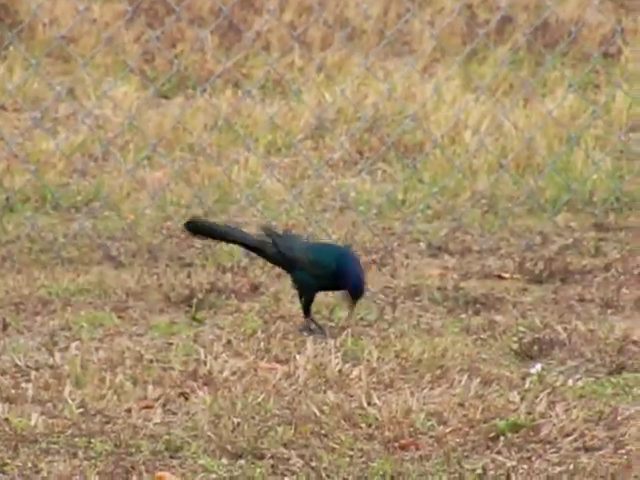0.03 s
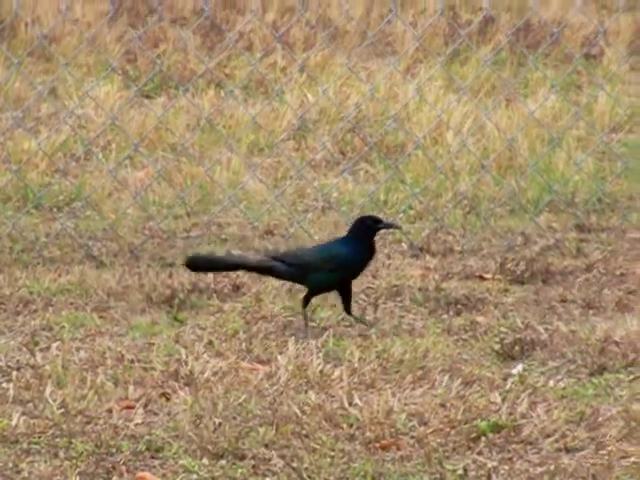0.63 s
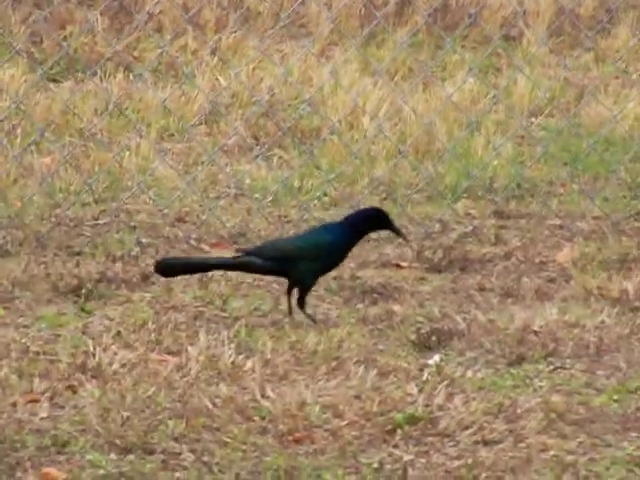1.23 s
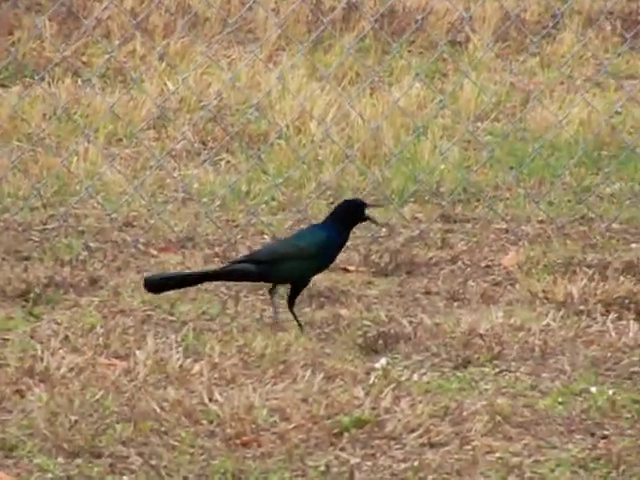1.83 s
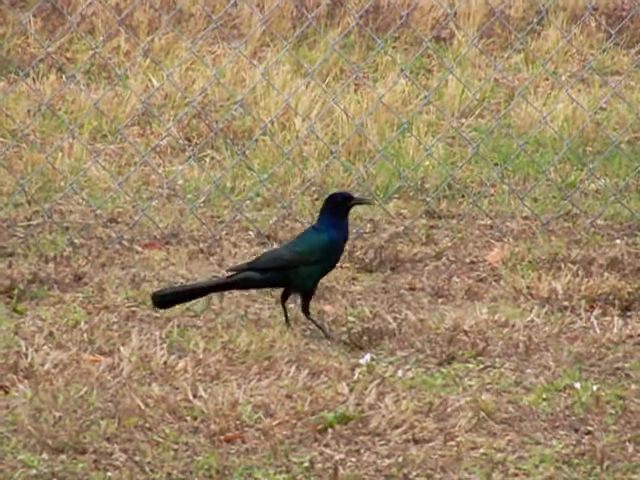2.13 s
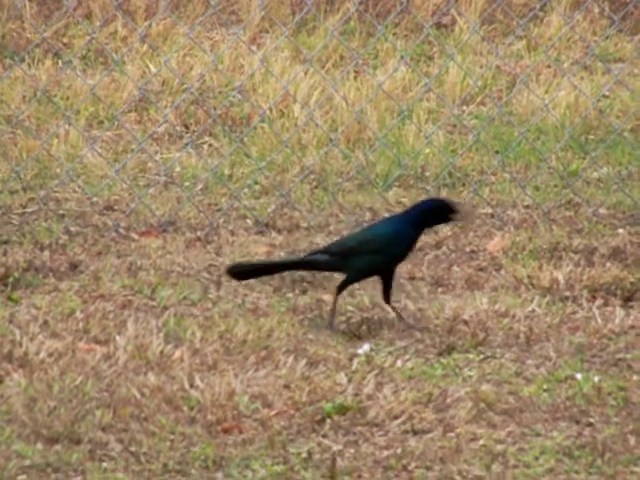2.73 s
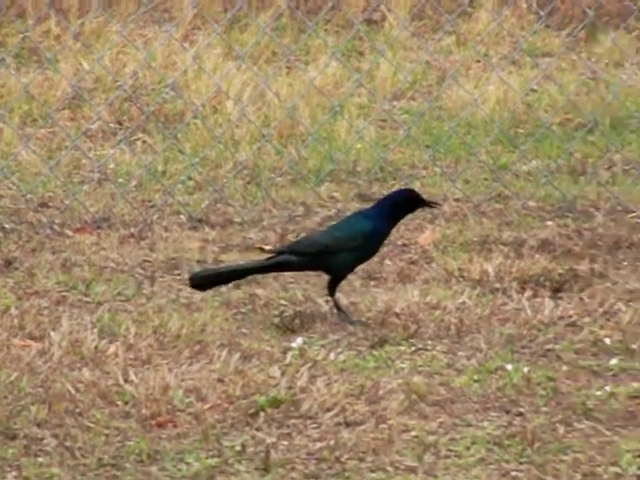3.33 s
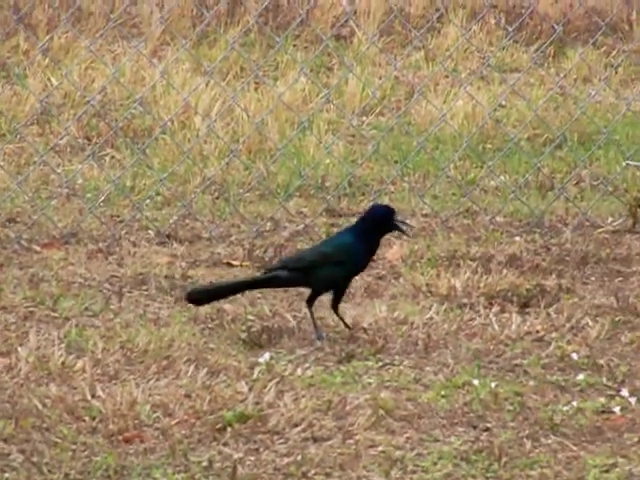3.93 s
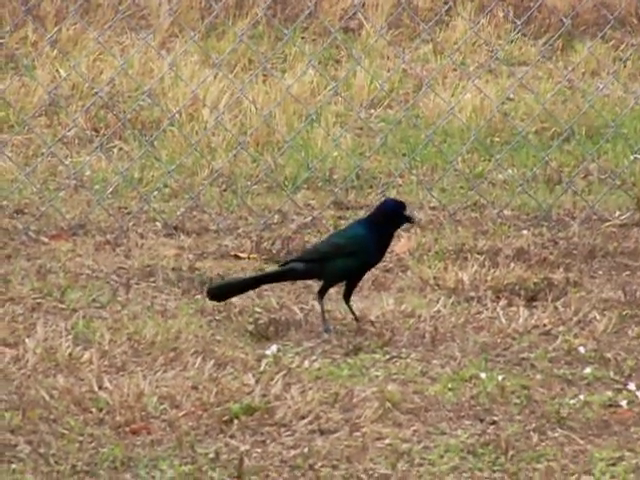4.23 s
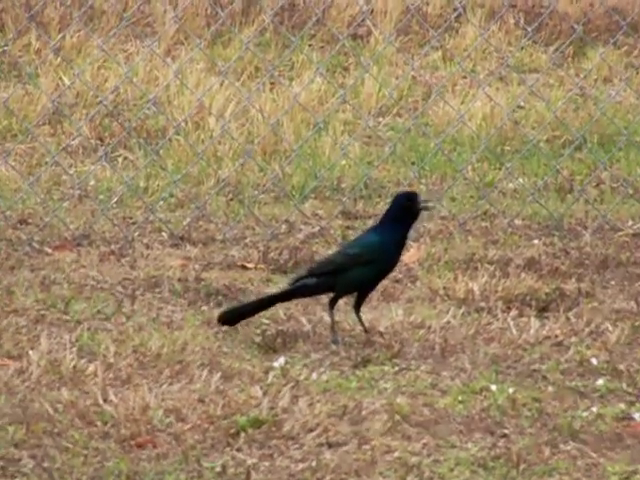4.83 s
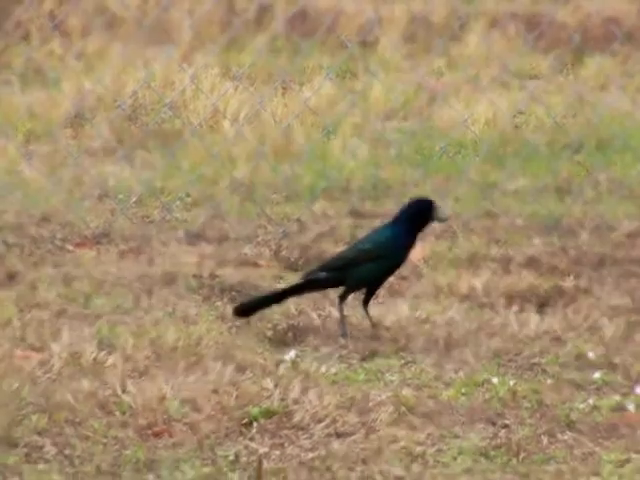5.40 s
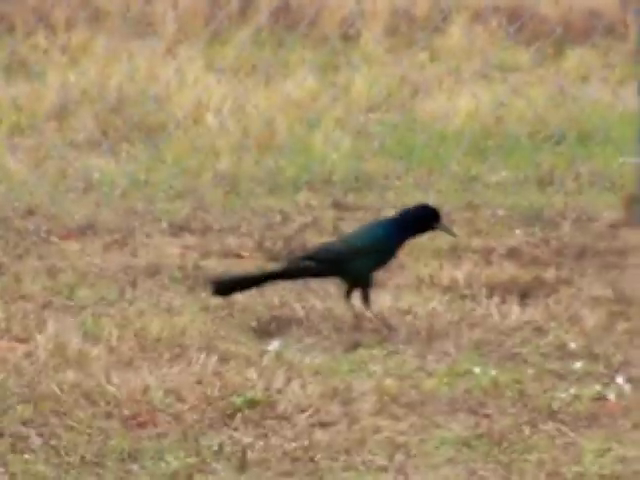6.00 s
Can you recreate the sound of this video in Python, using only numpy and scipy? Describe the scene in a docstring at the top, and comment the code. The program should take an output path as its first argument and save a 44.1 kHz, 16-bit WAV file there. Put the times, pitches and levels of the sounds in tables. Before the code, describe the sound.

A single grackle calls outdoors: first one loud, raspy note, then a quick, uneven series of about a dozen piercing whistles that fall in pitch and space out near the end. Before it starts, faint distant birds and tiny ticks of dry grass are heard. A gusty breeze rumbles softly on the microphone over a steady far-off rush and a weak hum, and each call leaves a brief outdoor tail.

```python
"""Open grass: a distant rush, a machine hum and a gusty breeze throughout; first, faint birds and ticks.
At 1.9 s a grackle gives one sharp, buzzy call, its syrinx membrane driven hard. The breeze freshens.
From 2.7 s to 6 s the grackle gives twelve quick down-slurred whistles.
Ground and trees scatter each call, then a far edge returns an echo.
The camera's gain control sinks with every call and recovers only slowly."""
import sys
import numpy as np
from scipy import signal
from scipy.fft import rfft, irfft, next_fast_len
from scipy.io import wavfile
from scipy.ndimage import uniform_filter1d, minimum_filter1d, map_coordinates

SR = 44100
rng = np.random.default_rng(int(sys.argv[2]) if len(sys.argv) > 2 else 0)


def transcribe(signal):
    """Save signal, clipped to [-1, 1], as a 16-bit WAV file at the path in sys.argv[1]."""
    frames = np.atleast_2d(signal).T
    limited = np.clip(frames, -1, 1)
    pcm = np.round(limited * 32767).astype(np.int16)
    wavfile.write(sys.argv[1], SR, pcm)


N = 267334
TIME_S = np.arange(N) / SR
SHARP_START_S, SHARP_HOLD_S = 1.893, .071

# Beak radiation: f/Hz, level/dB
BEAK_RESPONSE = [(1000, -2.5), (2200, -9.5), (3000, 0.5), (5000, -4), (6200, 5.5), (7600, 4.5)]

def grackle(aside_db=-5):
    """The beak beams overtones aside; the head moves between calls, so each scatters differently."""
    voice = filtered(sharp_call() + whistles(), lambda hz: amp(along(BEAK_RESPONSE, hz)))
    out = filtered(voice, lambda hz: amp(along([(5200, .025), (6500, aside_db)], hz)))
    starts_s = np.array([SHARP_START_S] + [row[0] for row in WHISTLE_NOTES]) - .02
    for start_s in starts_s:
        call = voice[round(start_s * SR):][:SR // 7]
        add(out, start_s, field_scatter(call))
    return out


# Buzz partials: multiple of pitch/4, level/dB
BUZZ_PARTIALS = [(1, -17.5), (2, -8), (3, -1.5), (5, -7), (6, -16), (7, -16)]

def sharp_call(release_s=.024, rasp_db=-9, flutter=1.9, jitter=.059):
    """Driven hard, the membrane repeats every fourth cycle: sidebands a quarter of the pitch apart."""
    t = np.arange(int((SHARP_HOLD_S + release_s) * SR)) / SR
    hz, level_db, buzz, rough = sharp_gesture(t)
    slack = np.clip((3200 - hz) / 1100, 0, 1)  # at low pitch it slaps shut: strong overtones
    jittered_hz = hz * (1 + jitter * rough * wobble(1500)[:len(t)])
    tone, phase = syrinx(jittered_hz, second_db=-27 + 29 * slack, third_db=-40 + 39 * slack)
    for multiple, partial_db in BUZZ_PARTIALS:
        waver = 1 + flutter * rough * wobble(600, SR // 4)[:len(t)]
        partial = np.sin(phase * multiple / 4 + rng.uniform(0, 2 * np.pi))
        tone += buzz * amp(partial_db) * waver * partial
    rasp = amp(rasp_db) * rough * wobble(6000, SR // 4)[:len(t)] * np.sin(phase)
    out = np.zeros(N)
    add(out, SHARP_START_S, amp(level_db) * (tone + rasp))
    return out


def sharp_gesture(t, start_hz=1650, held_hz=4820, catch_hz=480, lock_hz=4630, held_db=-7):
    """The voice climbs, holds with one dip, locks into a clean, deep buzz, then falls and breaks up."""
    lock_s, lock_width_s = .058, .012
    fall_hz_per_s, fall_db_per_s, breakup_s = 75000, 1200, .009
    climb = rise(t, centre_s=.0102, width_s=.0021)
    catch = bell(t, centre_s=.029, width_s=.003)
    lock = np.exp(-((t - lock_s) / lock_width_s) ** 4)
    released_s = since(t, SHARP_HOLD_S)
    breakup = np.clip(released_s / breakup_s, 0, 1)
    plateau_hz = held_hz + (lock_hz - held_hz) * lock - catch_hz * catch
    hz = start_hz + (plateau_hz - start_hz) * climb - fall_hz_per_s * released_s
    level_db = held_db + 22 * np.log10(climb + 1e-9) - fall_db_per_s * released_s
    deepening = lock * rise(t, lock_s, lock_width_s / 2)
    buzz = .13 * climb ** 2 + .23 * deepening + .27 * breakup
    rough = .32 * climb * (1 - lock) + .05 * lock + .38 * breakup
    return np.maximum(hz, start_hz), level_db, buzz, rough


# Whistles: t/s, level/dB, top f/Hz
WHISTLE_NOTES = [(2.728, -3, 5048), (3.2007, -4, 5038), (3.5156, -4, 5040), (3.711, -4, 4908),
                 (3.9326, -5, 5046), (4.13, -4, 4930), (4.352, -5, 4960), (4.5622, -6, 4790),
                 (4.7824, -4.5, 5072), (5.384, -4.5, 4960), (5.626, -7, 4886), (5.895, -6.4, 4940)]
# Air-stream hiss: f/Hz, relative level/dB
AIR_SPECTRUM = [(1500, -22.5), (3000, -3.5), (5500, -3.5), (7200, -9), (8200, -10)]

def whistles(second_db=-25.5, third_db=-32, slack_db=9, air_db=-39, taut_hz=4100, loose_hz=3150):
    """Down-slurred notes: the membrane roughens as it slackens; slack and effort add overtones."""
    out = np.zeros(N)
    air = noise(AIR_SPECTRUM)
    mean_db = np.mean([row[1] for row in WHISTLE_NOTES])
    t = np.arange(-.007, .08, 1 / SR)
    for start_s, level_db, top_hz in WHISTLE_NOTES:
        late, deep = rng.standard_normal(2)
        hz, gain = whistle_gesture(t, top_hz, break_s=.051 + .0008 * late, flourish=1 + .12 * deep)
        slack = np.clip((taut_hz - hz) / (taut_hz - loose_hz), 0, 1)
        jitter = (.004 + .02 * slack) * wobble(900, len(t))
        drift = .025 * slack * wobble(90, len(t))
        rich_db = slack_db * slack + .9 * (level_db - mean_db)
        tone, _ = syrinx(hz * (1 + jitter + drift), second_db + rich_db, third_db + rich_db)
        hiss = amp(air_db + rich_db) * air[round(start_s * SR):][:len(t)]
        add(out, start_s + t[0], amp(level_db) * gain * (tone + hiss))
    return out


def whistle_gesture(t, top_hz, break_s, flourish):
    """Pitch leaps, slides, dips at the break, flicks up and drops slack; level swells, then fades."""
    slack_hz, dip_hz, flick_hz = 2080, 758, 455
    leap_s, top_hold_s, slide_s, drop_s = .0015, .0055, .037, .0055
    lead_in_db, lead_in_s, swell_db, swell_s = -22.5, .004, 7.5, .013
    fade_db_per_s, sag_db_per_hz = 183.5, .008
    slide_hz = top_hz * (.65 + .35 * np.exp(-since(t, top_hold_s) / slide_s))
    dip = bell(t, break_s, width_s=.0036)
    flick = bell(t, break_s + .0052, width_s=.0022)
    turn_hz = flourish * (flick_hz * flick - dip_hz * dip)
    before_s = np.minimum(t, 0)
    tension = np.exp(before_s / leap_s - since(t, break_s + .007) / drop_s)
    hz = slack_hz + (slide_hz + turn_hz - slack_hz) * tension

    opened = 1 - bell(since(t, 0), 0, width_s=.001)
    attack = opened + (1 - opened) * amp(lead_in_db) * np.exp(before_s / lead_in_s)
    release = bell(since(t, break_s), 0, width_s=.0125)
    body_db = swell_db * (np.clip(t / swell_s, 0, 1) - 1) - fade_db_per_s * since(t, swell_s)
    sag_db = sag_db_per_hz * np.maximum(slide_hz - hz, 0) * (t > swell_s)
    return hz, attack * amp(body_db - sag_db) * release


def syrinx(hz, second_db, third_db):
    """A whistling membrane with two overtones; returns tone and phase."""
    phase = 2 * np.pi * np.cumsum(hz) / SR
    tone = np.sin(phase) + amp(second_db) * np.sin(2 * phase) + amp(third_db) * np.sin(3 * phase)
    return tone, phase


# Decay among the trees: f/Hz, T60/s
TREE_DECAY = [(1000, .3), (3000, 0.37), (4600, 0.43), (6500, 0.083), (9000, 0.42)]

def field_scatter(call, ground_db=-11, ground_t60_s=.13, trees_db=-24, echo_db=-33, echo_s=.22):
    """Quick scatter from the ground, a longer tail from trees, a blurred echo from the far edge."""
    hz, frame_s, spectrum = signal.stft(rng.standard_normal(SR // 2), SR, nperseg=256)
    decay = amp(-60 * frame_s / along(TREE_DECAY, hz)[:, None])
    _, trees = signal.istft(spectrum * decay, SR, nperseg=256)
    t = np.arange(len(trees)) / SR
    trees *= np.clip((t - .008) / .038, 0, 1)
    ground = rng.standard_normal(len(t)) * amp(-60 * t / ground_t60_s) * (t > .005)
    echo = rng.standard_normal(len(t)) * np.exp(-np.abs(t - echo_s) / .012)
    paths = [(ground_db, ground), (trees_db, trees), (echo_db, echo)]
    response = sum(amp(db) * path / np.linalg.norm(path) for db, path in paths)
    return signal.fftconvolve(call, response)


# Far calls: centre t/s, f/Hz, length/s, level/dB
FAR_CALLS = [(0.238, 2550, 0.19, -64), (1.02, 1840, .17, -54), (1.05, 4500, .16, -60),
             (1.1, 2600, .16, -58.5), (1.519, 5500, .28, -60.5), (2.38, 4800, 0.21, -55),
             (2.57, 6220, 0.29, -58.5)]

def far_birds(blur_hz=600):
    """Calls blurred by distance into narrow noise bands."""
    out = np.zeros(N)
    for centre_s, hz, length_s, level_db in FAR_CALLS:
        t = np.arange(int(length_s * SR)) / SR
        phase = 2 * np.pi * hz * t
        band = wobble(blur_hz, len(t)) * np.sin(phase) + wobble(blur_hz, len(t)) * np.cos(phase)
        add(out, centre_s - length_s / 2, amp(level_db) * np.sin(np.pi * t / length_s) * band)
    return out


# Grass ticks: t/s, level/dB
GRASS_TICKS = [(.33, -46), (.811, -57), (.965, -46), (1.352, -48)]

def grass_ticks(t60_s=.021):
    """Dry grass ticks in short, bright noise bursts."""
    out = np.zeros(N)
    t = np.arange(SR // 50) / SR
    for start_s, level_db in GRASS_TICKS:
        burst = np.diff(rng.standard_normal(len(t) + 1))
        add(out, start_s, amp(level_db - 60 * t / t60_s) * burst)
    return out


# Wind rumble: f/Hz, relative level/dB
RUMBLE_SPECTRUM = [(12, -30.5), (20, 6), (43, 1.5), (76, -2.5), (209, -17), (239, -19.5), (350, -25),
                   (460, -47.5), (770, -120)]
# Eddy thumps: f/Hz, relative level/dB
EDDY_SPECTRUM = [(20, 0), (80, 0), (140, -9), (220, -20), (500, -50), (1000, -120)]

def breeze(rumble_trim_db=-1, thump_trim_db=-2):
    """Wind buffets the microphone; only strong gusts break into thumping eddies."""
    wind_db = wind_level_db()
    rumble = amp(wind_db + rumble_trim_db + wobble(5.4)) * noise(RUMBLE_SPECTRUM)
    excess = np.clip(2 * (wind_db - wind_db.mean()) / np.ptp(wind_db), 0, 1)
    thumps = amp(wind_db + thump_trim_db) * excess * noise(EDDY_SPECTRUM)
    return rumble + thumps


# Gusts: peak t/s, level/dB, half-width/s
WIND_GUSTS = [(.02, -45.5, .06), (1.05, -38, .11), (1.21, -41, 0.092), (1.64, -48.5, .05),
              (2, -39.5, 0.092), (2.31, -40, .05), (2.87, -36, 0.056), (3.12, -38.5, .17),
              (3.591, -41.5, .06), (4.22, -38, .06), (4.77, -41, .1), (5.9, -42, .08)]

def wind_level_db(calm_db=-50.5, fresh_db=-43.4):
    """Gusts swell and die on top of a breeze that freshens once."""
    steady_db = calm_db + (fresh_db - calm_db) * rise(TIME_S, centre_s=2.45, width_s=.3)
    gusts = [amp(db) * bell(TIME_S, peak_s, width_s) for peak_s, db, width_s in WIND_GUSTS]
    return 10 * np.log10(amp(steady_db) ** 2 + sum(gust ** 2 for gust in gusts))


# Distant rush: f/Hz, relative level/dB
RUSH_SPECTRUM = [(20, 0), (100, 4), (200, 0.5), (350, -4.5), (700, -5.5), (1200, -8.5), (2000, -12),
                 (3200, -14.5), (5000, -16), (6500, -19.5), (7600, -18), (8200, -41.5), (9000, -54)]

def distant_rush(rms_db=-48.5):
    """Steady broadband noise, strongest in the bass."""
    return amp(rms_db) * noise(RUSH_SPECTRUM)


# Hum partials: f/Hz, rms level/dB
HUM_PARTIALS = [(968, -64.5), (1934, -71.5), (4834, -70)]

def machine_hum(waver_db=1.6, waver_hz=4):
    """A machine's tones, each wavering in level and pitch."""
    out = np.zeros(N)
    for hz, rms_db in HUM_PARTIALS:
        gain = np.sqrt(2) * amp(rms_db + waver_db * wobble(3))
        phase = 2 * np.pi * np.cumsum(hz + waver_hz * wobble(18)) / SR
        out += gain * np.sin(phase)
    return out


def gain_control(x, threshold_db=-32, grip=35, exponent=1.157, recovery_s=6, ceiling_db=-13):
    """Loud sound charges a leaky store that lowers the gain; a fast limiter crackles when overdriven."""
    envelope = np.abs(signal.hilbert(x, next_fast_len(N))[:N])
    excess = np.clip(envelope - amp(threshold_db), 0, amp(ceiling_db))
    charge = signal.lfilter([1 / SR], [1, -np.exp(-1 / (recovery_s * SR))], excess)
    gain = (1 + grip * charge) ** -exponent
    needed = np.minimum(1, amp(ceiling_db) / (gain * uniform_filter1d(envelope, size=40) + 1e-9))
    limit = uniform_filter1d(minimum_filter1d(needed, size=40), size=40)
    crackle = amp(-27) * (1 - limit) * noise([(100, 2.5), (500, 1.5), (2000, -2.5), (8000, -25)])
    return x * gain * limit + crackle


# Converter output filter: f/Hz, level/dB
OUTPUT_RESPONSE = [(7000, 0), (8000, -3), (8600, -20), (9100, -26.5)]

def converter(x, rate_hz=16000, top_hz=9150):
    """Slow sampling mirrors the top of the band upward before the output filter cuts it."""
    band = filtered(x, lambda hz: np.clip((rate_hz / 2 + 200 - hz) / 400, 0, 1))
    mirrored = band * (1 + 2 * np.cos(2 * np.pi * rate_hz * TIME_S))
    return filtered(
        mirrored, lambda hz: amp(along(OUTPUT_RESPONSE, hz)) * np.clip((top_hz - hz) / 200, 0, 1))


def amp(db):
    """Decibels to gain."""
    return 10 ** (np.asarray(db) / 20)


def along(points, hz):
    """Interpolate (f/Hz, value) points on a log axis."""
    knots_hz, values = np.transpose(points)
    return np.interp(np.log(hz + 1), np.log(knots_hz), values)


def wobble(rate_hz, size=N):
    """Smooth random curve with knots at rate_hz."""
    knots = rng.standard_normal(int(size * rate_hz / SR) + 4)
    return map_coordinates(knots, [np.arange(size) * rate_hz / SR])


def filtered(x, response):
    """Apply a gain given as a function of f/Hz."""
    size = next_fast_len(N + SR // 2)
    return irfft(rfft(x, size) * response(np.fft.rfftfreq(size, 1 / SR)), size)[:N]


def noise(spectrum):
    """Coloured noise of rms 1."""
    x = filtered(rng.standard_normal(N), lambda hz: amp(along(spectrum, hz)))
    return x / np.sqrt(np.mean(x ** 2) + 1e-20)


def add(track, start_s, sound):
    """Mix a sound in at start_s."""
    part = track[max(0, round(start_s * SR)):][:len(sound)]
    part += sound[:len(part)]


def bell(t, centre_s, width_s):
    """Gaussian bump of height 1."""
    return np.exp(-((t - centre_s) / width_s) ** 2)


def rise(t, centre_s, width_s):
    """Smooth step from 0 to 1."""
    return .5 + .5 * np.tanh(.5 * (t - centre_s) / width_s)


def since(t, start_s):
    """Time after start_s; 0 before it."""
    return np.maximum(t - start_s, 0)


def scene():
    """The grackle in front of its surroundings, mono."""
    return (grackle() + far_birds() + grass_ticks() + distant_rush() + machine_hum() + breeze())[None]


def record(dry):
    """The camera: gain control, then converter."""
    return converter(gain_control(dry[0]))[None]


dry = scene()
out = record(dry)
transcribe(out)
```